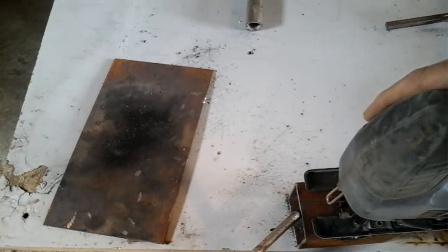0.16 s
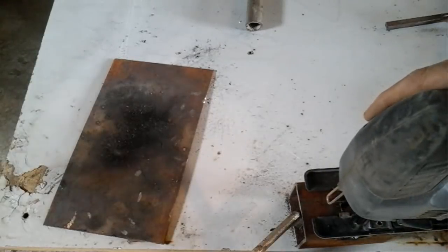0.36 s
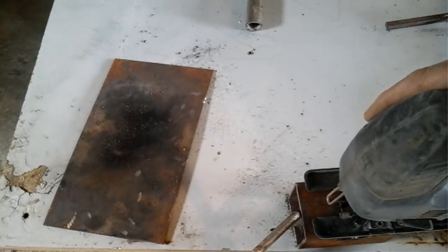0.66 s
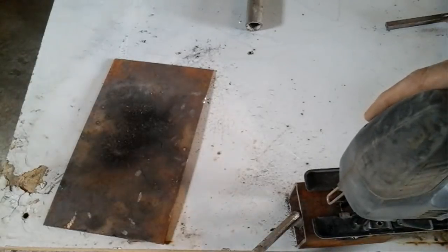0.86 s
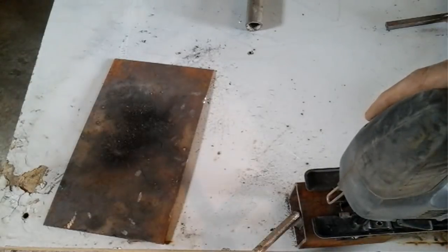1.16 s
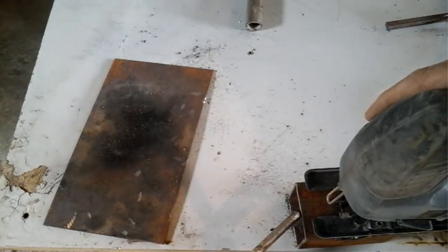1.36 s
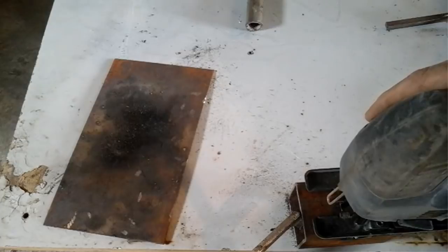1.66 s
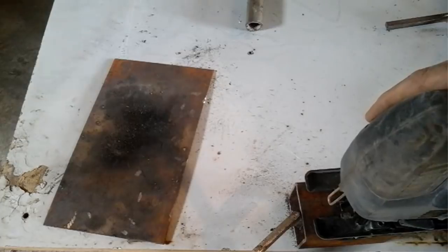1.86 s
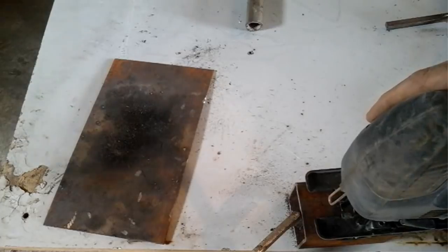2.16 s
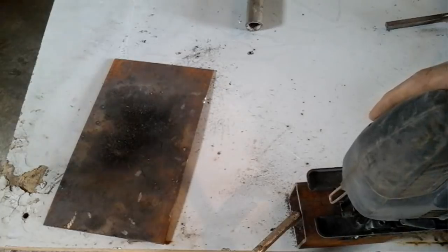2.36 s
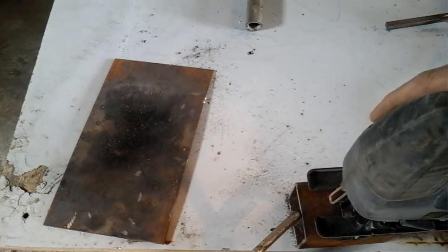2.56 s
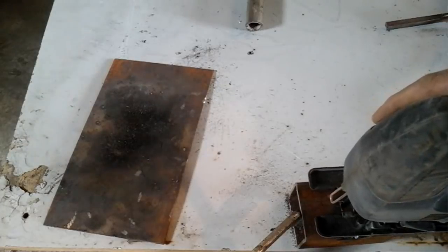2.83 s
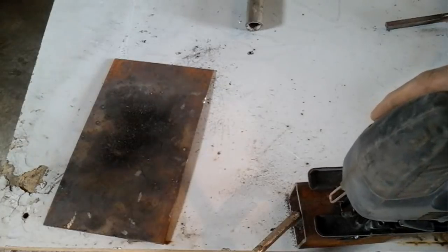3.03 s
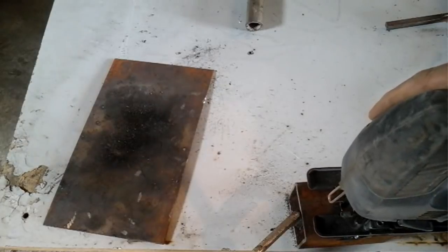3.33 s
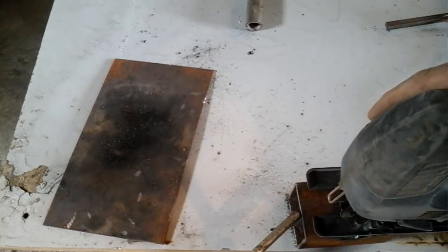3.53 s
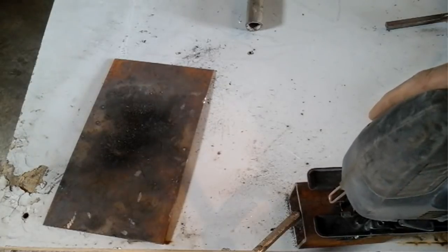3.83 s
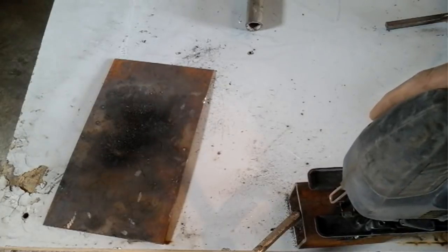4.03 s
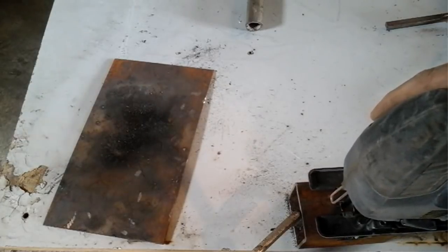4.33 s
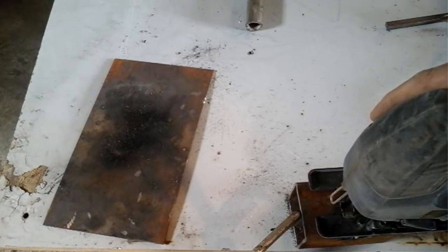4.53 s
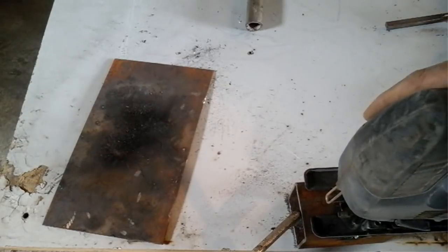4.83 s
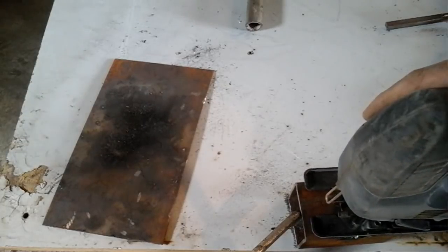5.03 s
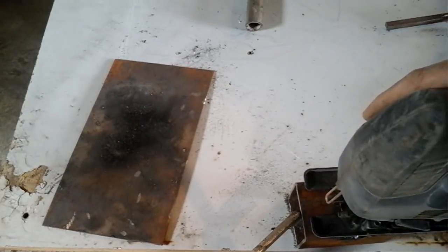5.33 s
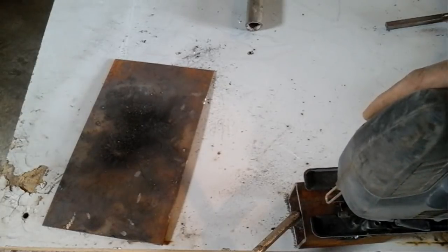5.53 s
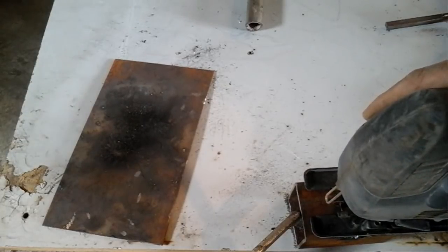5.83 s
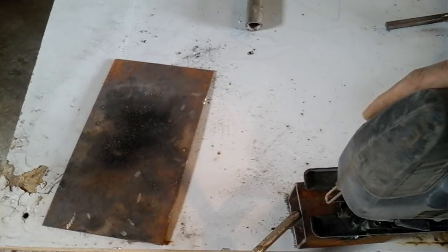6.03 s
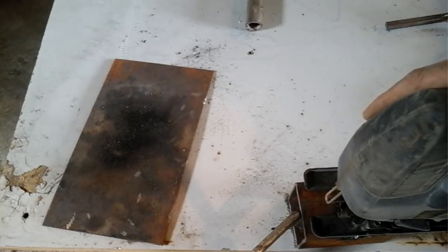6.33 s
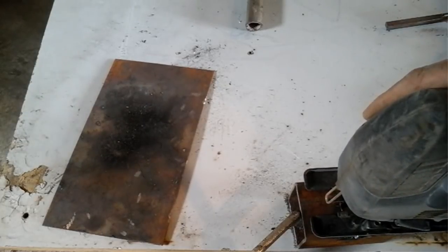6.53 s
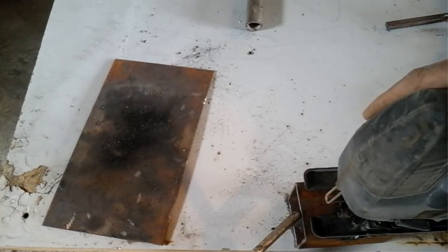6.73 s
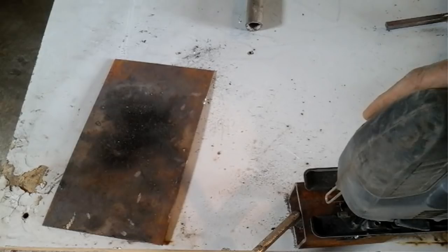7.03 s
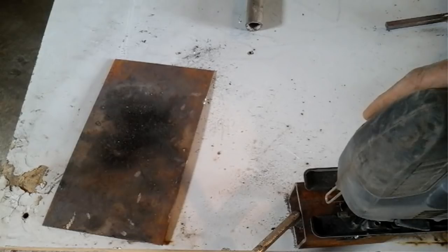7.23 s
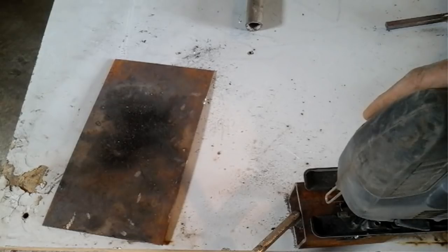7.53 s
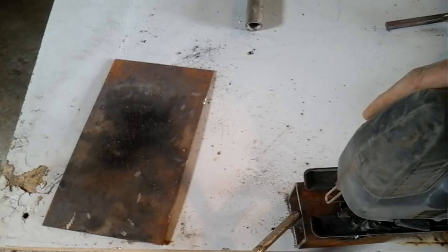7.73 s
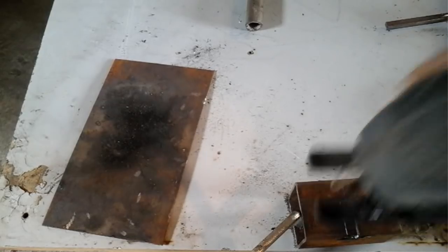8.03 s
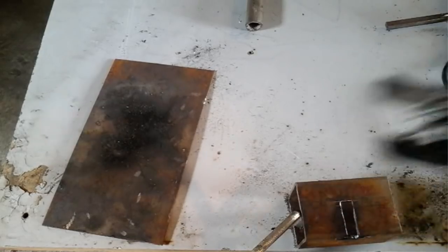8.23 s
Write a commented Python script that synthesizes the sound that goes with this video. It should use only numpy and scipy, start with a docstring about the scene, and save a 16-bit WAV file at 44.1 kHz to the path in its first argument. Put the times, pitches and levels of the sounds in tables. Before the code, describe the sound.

In a small workshop, an electric jigsaw close to the microphone kicks on, whines quickly up to speed and bites into steel. A loud, harsh, rattling buzz with a rough ringing blade holds steady, then gradually slows. Scrapes, squeaks and tooth pings give way to spaced knocks on the bench. It stops; a faint hum remains, and the blade clinks softly as it is lifted out.

```python
"""An electric jigsaw cuts a small steel piece on a workshop bench, close by and to the right, over a faint hum.
The motor kicks on the mains and whines up to 54 strokes a second; the blade bites and sings in the cut.
It coasts down through scrapes, squeaks and tooth pings into single knocks and stops; the blade clinks on lifting.
One crank speed drives coloured noise in impact envelopes, motor tones and narrow-band blade resonances.
"""
import sys
import numpy as np
from scipy import signal
from scipy.fft import rfft, irfft, next_fast_len
from scipy.io import wavfile
from scipy.ndimage import map_coordinates

SR = 44100
rng = np.random.default_rng(int(sys.argv[2]) if len(sys.argv) > 2 else 0)


def to_wav(s):
    """Save 16-bit WAV."""
    ch = np.atleast_2d(s).T  # columns
    pcm = np.round(np.clip(ch, -1, 1) * 32767)  # PCM
    wavfile.write(sys.argv[1], SR, pcm.astype(np.int16))


N = 369996

# Colour of blade on steel. Each row: frequency in Hz, relative density in dB per Hz.
CHATTER_COLOUR = [(700, -38), (1300, -12), (1800, -1.5), (2300, 0), (3200, -0.5), (4400, -5.5), (5500, -7),
                  (7000, -13.5), (9500, -25), (15000, -30)]
FULL_STROKES_PER_S = 54.35
REST_TURNS = .3622  # the crank comes to rest this far past its last knock


def amp(db):
    """Amplitude factor of a level in dB."""
    return 10 ** (np.asarray(db) / 20)


def unit(x):
    """Scale to rms 1."""
    return x / np.sqrt(np.mean(x ** 2) + 1e-20)


def along(points, hz):
    """Interpolate (Hz, value) points on a log frequency axis."""
    f, v = np.transpose(points)
    return np.interp(np.log(hz + 1), np.log(f + 1), v)


def curves(rows):
    """One value per sample for each column after the time."""
    s, *cols = np.transpose(rows)
    return [np.interp(np.arange(N) / SR, s, c) for c in cols]


def wobble(rate_hz):
    """Smooth random curve, rate_hz knots a second."""
    knots = rng.standard_normal(int(N * rate_hz / SR) + 4)
    fine = map_coordinates(knots, [np.arange(8 * len(knots)) / 8])
    return np.interp(np.arange(N) * (8 * rate_hz / SR), np.arange(len(fine)), fine)


def filtered(x, response):
    """Multiply the spectrum of x by a function of frequency."""
    m = next_fast_len(N + 8192)
    return irfft(rfft(x, m) * response(np.fft.rfftfreq(m, 1 / SR)), m)[..., :N]


def noise(spectrum):
    """Two unrelated noises of the given colour, rms 1 over both."""
    return unit(filtered(rng.standard_normal((2, N)), lambda hz: amp(along(spectrum, hz))))


def narrow(hz, width_hz):
    """Rough tone of rms 1: a carrier with random complex amplitude."""
    carrier = np.exp(2j * np.pi * np.cumsum(hz * np.ones(N)) / SR)
    return unit(((wobble(width_hz) + 1j * wobble(width_hz)) * carrier).real)


def placed(spectrum):
    """Stereo noise at the saw's place: scattered mid and side plus direct treble; its middle has rms 1."""
    # Each row: frequency in Hz, side minus mid in dB.
    side_width = [(30, -2.5), (110, 5), (200, 15), (380, 11), (700, 1.5), (1290, -2.5), (2380, -1),
                  (4400, 1), (15000, 0)]
    # Each row: frequency in Hz, left minus right in dB.
    side_lean = [(60, -7.5), (110, -5.5), (200, 3), (380, -1), (700, -3.5), (1290, 4), (2380, -6),
                 (4400, -13.5), (8120, -2.5), (15000, -3)]
    direct_db, left_lag_s = -2.5, .00043

    size = next_fast_len(N + 1)
    hz = np.fft.rfftfreq(2 * (size // 2), 1 / SR)
    white = rng.standard_normal((3, len(hz))) + 1j * rng.standard_normal((3, len(hz)))
    mid = white[0]
    side = white[1] * amp(along(side_width, hz))
    direct = white[2] * amp(direct_db) * np.clip(hz / 1000, 0, 1)
    left = mid + side + direct * np.exp(-2j * np.pi * hz * left_lag_s)
    right = mid - side + direct
    lean = amp(along(side_lean, hz) / 2)
    pair = irfft(np.array([left * lean, right / lean]) * amp(along(spectrum, hz)))[:, :N]
    return pair / np.std(pair.mean(0))


def bursts(times_s, sizes, t60_s, attack_s):
    """Envelope of impacts that rise quickly and die away; their powers add."""
    t = np.arange(SR // 4) / SR
    shape = amp(-60 * t / t60_s) * (1 - np.exp(-t / attack_s))
    at = np.clip(times_s * SR, 0, N).astype(int)
    power = np.bincount(at, sizes ** 2, N + 1)[:N]
    return np.sqrt(np.abs(signal.fftconvolve(power, (shape / shape.max()) ** 2)[:N]))


def blows(rows, spectrum, t60_s, attack_s, gain_db):
    """Single blows at listed times and levels: short bursts of coloured noise."""
    s, db = np.transpose(rows)
    return placed(spectrum) * bursts(s, amp(db + gain_db), t60_s, attack_s)


def crank_speed():
    """Strokes per second: the motor runs up, holds, then coasts against friction and air drag."""
    run_up_s, run_up_bend = .16, .8
    stop_s, friction_strokes_per_s2 = 7.68, 16.577
    drag_strokes_per_s = 62.124  # air drag equals friction at this speed

    t = np.arange(N) / SR
    driven = FULL_STROKES_PER_S * (1 - np.exp(-(t / run_up_s) ** run_up_bend))
    angle = np.clip(friction_strokes_per_s2 * (stop_s - t) / drag_strokes_per_s, 0, 1)
    coasting = drag_strokes_per_s * np.tan(angle)
    return np.minimum(driven, coasting)


def loudness(speed, full_db, octave_db, stall, bite_db):
    """Gain of a layer: follows speed in dB per octave, halves at stall (strokes/s), lower until the teeth bite."""
    bite_s = .17
    speed = np.maximum(speed, .1)
    skating = np.clip(1 - np.arange(N) / SR / bite_s, 0, 1)
    stalling = 1 + (stall / speed) ** 3
    return amp(full_db + octave_db * np.log2(speed / FULL_STROKES_PER_S) - bite_db * skating) / stalling


def before_rest(crank, turns):
    """Samples at which the crank still has so many turns to go."""
    return np.searchsorted(crank, crank[-1] - turns)


def impacts(crank, scatter_turns, size_db):
    """Impacts as the plunger reverses and the teeth bite: one round per stroke, scattered in place and force."""
    # Each row: crank position in turns, mean level in dB.
    stroke_impacts = [(0, -12), (0.222, -11), (0.447, -11.5), (0.529, -12), (0.759, -12), (.86, -13)]
    place, db = np.transpose(stroke_impacts)
    stroke = np.arange(int(crank[-1]))[:, None]
    chance = rng.standard_normal((len(stroke), len(place), 2))
    turns = stroke + place + scatter_turns * chance[..., 0]
    times_s = np.interp(turns.ravel(), crank, np.arange(N) / SR)
    return times_s, amp(db + size_db * chance[..., 1]).ravel()


def sawing(speed, crank):
    """Blade chatter, housing rattle and chip fizz: noises beaten by the impacts of each stroke."""
    # Each row: frequency in Hz, relative density in dB per Hz.
    rattle_colour = [(20, -12), (60, -15.5), (130, -8.5), (260, -8), (450, -4), (570, 2), (700, 1.5),
                     (1050, 4.5), (1300, 3.5), (1490, 8), (1750, -1.5), (2200, 0.5), (3500, -10),
                     (8000, -30.5)]
    # Each row: frequency in Hz, relative density in dB per Hz.
    fizz_colour = [(4000, -4.5), (7000, -3), (8500, 1.5), (10000, -2), (12500, -5), (14200, -6.5),
                   (15800, -17)]

    times_s, sizes = impacts(crank, scatter_turns=.026, size_db=1.8)
    # a slow crank hammers less: mostly the rubbing of teeth and gears is left
    hammer = np.clip((speed - 8) / 22, .1, 1) ** 2

    def beat(rub, t60_s, attack_s):
        envelope = unit(bursts(times_s, sizes, t60_s, attack_s))
        return np.sqrt((hammer * envelope ** 2 + rub ** 2) / (1 + rub ** 2))

    chatter = placed(CHATTER_COLOUR) * beat(rub=.6, t60_s=.022, attack_s=.00004)
    rattle = placed(rattle_colour) * beat(rub=.41, t60_s=.049, attack_s=.00034)
    fizz = placed(fizz_colour) * beat(rub=.85, t60_s=.035, attack_s=.00002)
    fizz = fizz * amp(.65 * wobble(11))  # the chips come unevenly
    out = chatter * loudness(speed, full_db=-24, octave_db=.56, stall=7.5, bite_db=4.5)
    out = out + rattle * loudness(speed, full_db=-31, octave_db=-2.13, stall=6, bite_db=6.5)
    return out + fizz * loudness(speed, full_db=-36, octave_db=3, stall=6.5, bite_db=18.5)


def backlash(speed, knock_s, free_turns, depth_db):
    """Gain dip just before each knock, as the slow crank crosses its play."""
    t = np.arange(N) / SR
    following = np.clip(np.searchsorted(knock_s, t), 0, len(knock_s) - 1)
    until_s = knock_s[following] - t
    slow = np.clip(1 - speed / 38, 0, 1)
    return amp(-depth_db * slow * np.exp(-(until_s * speed / free_turns) ** 2) * (until_s > 0))


def grit(speed, crank, count, size_db, t60_s):
    """Chips break off at random places in the stroke: a dense, sharp crackle."""
    # Each row: frequency in Hz, relative density in dB per Hz.
    grit_colour = [(1200, -18), (2000, 3), (3000, 2.5), (4600, -0.5), (6500, -11.5), (9000, -15.5),
                   (15000, -18)]
    times_s = np.interp(rng.uniform(0, crank[-1], count), crank, np.arange(N) / SR)
    sizes = amp(size_db * rng.uniform(-1, 1, count))
    crackle = unit(bursts(times_s, sizes, t60_s, attack_s=1 / SR))
    gain = loudness(speed, full_db=-31.5, octave_db=8, stall=9, bite_db=15)
    return placed(grit_colour) * crackle * gain


def rasp(speed, wander_hz, swell_db):
    """Rasping blade resonances wander and come and go as the blade leans on the cut."""
    # Each row: frequency in Hz, width in Hz, relative left level in dB, relative right level in dB.
    rasp_bands = [(3500, 450, -12, -1), (4560, 380, -6, -2.5), (6000, 500, -16, -11),
                  (11200, 500, -23, -22), (13600, 250, -28, -27)]
    out = np.zeros((2, N))
    for hz, width_hz, left_db, right_db in rasp_bands:
        pitch_hz = hz + wander_hz * wobble(3)
        swell = unit(amp(swell_db * wobble(7)))
        out += swell * np.array([amp(db) * narrow(pitch_hz, width_hz) for db in (left_db, right_db)])
    return out * loudness(speed, full_db=-29, octave_db=6.5, stall=7, bite_db=12)


def mesh_whirr(speed, width_hz, follow):
    """Narrow, rough gear-mesh whirr: its pitch follows speed and rises over the first seconds."""
    start_hz, deep_hz, sink_s = 2080, 2443, 2.6
    sinking_hz = np.interp(np.arange(N) / SR, [0, sink_s], [start_hz, deep_hz])
    hz = sinking_hz * (speed / FULL_STROKES_PER_S) ** follow + 75 * wobble(7)
    pair = np.array([amp(-1) * narrow(hz, width_hz), narrow(hz, width_hz)])
    return pair * loudness(speed, full_db=-27.8, octave_db=9, stall=9, bite_db=14.5)


def kicks():
    """The motor jerks its gears once a mains cycle as it starts."""
    # Each row: start in seconds, relative level in dB.
    kick_times = [(0.0, -7), (0.016, -3.5), (0.0325, -4.5), (0.049, -4.5), (0.0645, -4.5), (0.08, -15)]
    # Each row: frequency in Hz, relative density in dB per Hz.
    kick_colour = [(59, -59), (100, -45), (236, -27), (462, -2.5), (1000, -6.5), (1320, -12.5), (1600, 0),
                   (2300, -2.5), (3150, 1), (3600, -3.5), (4050, -14.5), (4540, -11), (6500, -18),
                   (15000, -33.5)]
    return blows(kick_times, kick_colour, t60_s=.014, attack_s=.00087, gain_db=-12)


def whine(speed, crank, flutter_db):
    """Whirr, gear mesh and high whine, strongest as the motor strains up to speed; gear play smears phase."""
    # Each row: multiple of the stroke rate, relative free-running level in dB,
    # relative level at full strain in dB, phase smear in rad.
    motor_tones = [(23, -7.5, -26, 1), (42, -4.5, 1.5, 1.2), (97, -14, 13.5, .85)]
    # Housing resonances. Each row: frequency in Hz, half width in Hz, added amplitude in dB.
    housing_modes = [(575, 44, 12), (774, 65, 9.5), (1556, 75, 12)]
    strain_at, strain_span = .66, .215  # shares of full speed

    reached = np.maximum.accumulate(speed) / FULL_STROKES_PER_S
    strain = np.exp(-np.abs((reached - strain_at) / strain_span) ** 3)
    out = np.zeros((2, N))
    for k, free_db, strain_db, stray_rad in motor_tones:
        housing = 1 + sum(amp(db) / (1 + ((k * speed - hz) / half_hz) ** 2)
                          for hz, half_hz, db in housing_modes)
        for channel, side_db in enumerate((1.5, 4)):
            phase = 2 * np.pi * k * crank + stray_rad * wobble(3 * k)
            tone = amp(side_db + flutter_db * wobble(40)) * np.sin(phase)
            out[channel] += (amp(free_db) + amp(strain_db) * strain) * housing * tone
    return out * loudness(speed, full_db=-41, octave_db=5, stall=9, bite_db=5)


def shaking(speed, crank, waver_db, stray_rad):
    """The plunger shakes the bench at multiples of the stroke rate, the two sides out of phase."""
    # Each row: multiple of the stroke rate, relative level in dB.
    shake_orders = [(2, -8), (4, 2.5), (6, -10), (8, -5), (9, -4.5), (11, 0.5), (14, 5.5), (15, 4.5)]
    tone = np.zeros(N, complex)
    for k, db in shake_orders:
        phase = 2 * np.pi * round(k) * crank + stray_rad * wobble(12)
        tone += amp(db + waver_db * wobble(7)) * np.exp(1j * phase)
    pair = np.array([amp(8.7) * tone.real, amp(5) * (tone * np.exp(2.7j)).real])
    return pair * loudness(speed, full_db=-50.5, octave_db=9, stall=9, bite_db=14)


def scrapes():
    """The slowing blade binds and chatters against the steel."""
    # Each row: start in seconds, relative level in dB.
    scrape_times = [(6.2334, -23.5), (6.2923, -30), (6.3766, -23), (6.4215, -16), (6.4449, -22),
                    (6.4923, -23.5), (6.5956, -19.5), (6.6505, -20), (6.7093, -26), (6.9139, -20),
                    (6.9967, -25.5), (7.2047, -30), (7.355, -26.5)]
    return blows(scrape_times, CHATTER_COLOUR, t60_s=.067, attack_s=.0008, gain_db=-7.5)


def teeth(speed, crank, count, gap_turns, size_db, cutting_db):
    """Single teeth catch and ping at uneven steps, strongest on the cutting stroke after a knock."""
    # Each row: frequency in Hz, relative density in dB per Hz.
    tooth_colour = [(5000, -40), (7000, -8.5), (7800, -5.5), (8700, -14.5), (11300, -14), (12600, -8.5),
                    (13600, -12), (15800, -21)]
    last_tooth_turns = .7  # before the last knock
    chance = rng.standard_normal((count, 2))
    turns = last_tooth_turns + gap_turns * np.abs(np.arange(count) + .3 * chance[:, 0])
    at = before_rest(crank, REST_TURNS + turns)
    force_db = size_db * chance[:, 1] - cutting_db * np.sin(2 * np.pi * turns)
    gain = loudness(speed, full_db=-43.5, octave_db=1, stall=4, bite_db=0)
    sizes = gain[at] * amp(force_db) * np.linspace(1, .3, count)
    return placed(tooth_colour) * bursts(at / SR, sizes, t60_s=.031, attack_s=.0003)


def knocks(speed, crank, count):
    """Times and sizes of the slowing plunger's knocks, one at each end of its travel."""
    merge_strokes_per_s, merge_span = 34.6, 16  # knocks emerge from the rattle over this span below this speed
    return_db = -16  # the far end of the travel is softer
    half = np.arange(count)[::-1]
    at = before_rest(crank, REST_TURNS + half / 2)
    apart = np.clip((merge_strokes_per_s - speed[at]) / merge_span, 0, 1)
    gain = loudness(speed, full_db=-23.5, octave_db=-4, stall=7, bite_db=0)
    return at / SR, gain[at] * apart * amp(return_db * (half % 2))


def knocking(knock_s, knock_sizes):
    """Each knock is a short burst of noise, and the housing rings on after it."""
    # Each row: frequency in Hz, relative density in dB per Hz.
    knock_colour = [(35, -45), (60, -11), (195, -13.5), (514, 0.5), (798, -0.5), (1450, 1), (2650, -2.5),
                    (2980, -6), (3580, 0), (4020, -10), (7500, -18), (12500, -27.5), (15000, -33.5)]
    # Each row: frequency in Hz, relative density in dB per Hz.
    ring_colour = [(120, -26), (190, -9), (280, -19), (480, -17), (570, 2), (680, -17), (1100, -25),
                   (1330, -16), (1470, 2.5), (1620, -13), (1900, -26), (4800, -18), (5350, -10),
                   (5900, -29), (9000, -53.5)]
    hit = placed(knock_colour) * bursts(knock_s, knock_sizes, t60_s=.07, attack_s=.0014)
    ring = placed(ring_colour) * bursts(knock_s, knock_sizes, t60_s=.31, attack_s=.0041)
    return amp(-8.5) * hit + amp(-22.5) * ring


def thuds(times_s, sizes, attack_s):
    """Knocks go through the clamp into the bench, whose damped modes give a short, hollow thud."""
    # Each row: mean frequency in Hz, relative mean level in dB, t60 in seconds.
    bench_modes = [(430, -14, .07), (560, -8.5, .09), (650, -10.5, .06), (820, -13, .05), (1450, -12, .06),
                   (1680, -14, .04)]
    spread_rad = 1.92  # phase between left and right
    out, t = np.zeros((2, N + SR)), np.arange(SR // 4) / SR
    for s, size in zip(times_s, sizes):
        for hz, db, t60_s in bench_modes:
            phase = rng.uniform(0, 2 * np.pi) + np.array([[0], [spread_rad]])
            decay = amp(db + rng.normal(0, 2) - 60 * t / t60_s)
            ring = decay * np.sin(2 * np.pi * hz * rng.normal(1, .03) * t + phase)
            out[:, round(s * SR):][:, :len(t)] += size * ring * (1 - np.exp(-t / attack_s))
    return out[:, :N]


def ticks():
    """Single teeth snap over the edge of the cut."""
    # Each row: start in seconds, relative level in dB.
    tick_times = [(7.3362, -26.5), (7.3906, -30), (7.416, -35.5), (7.4729, -29)]
    # Each row: frequency in Hz, relative density in dB per Hz.
    tick_colour = [(3000, -36), (5500, -3.5), (8000, -4.5), (11000, 1.5), (13000, -6), (15800, -9)]
    return blows(tick_times, tick_colour, t60_s=.017, attack_s=.0002, gain_db=-5)


def squeaks(sag, waver):
    """The blade squeaks in its last strokes and on its way out: tones that swell and die as their pitch sags."""
    # Each row: start in seconds, length in seconds, mid pitch in Hz, peak level in dB.
    squeak_rows = [(7.17, .12, 5380, -49), (7.35, 0.11, 5400, -53), (7.31, 0.052, 2401, -36),
                   (7.305, .035, 8600, -48), (7.348, .025, 3200, -36), (7.5, .12, 7870, -65),
                   (8.123, .065, 5230, -65), (8.13, .06, 4490, -68)]
    out = np.zeros(N)
    for s, length_s, hz, db in squeak_rows:
        u = np.linspace(0, 1, int(length_s * SR))
        pitch_hz = hz * (1 + sag * (.5 - u) + waver * wobble(302)[:len(u)])
        tone = np.sin(2 * np.pi * np.cumsum(pitch_hz) / SR)
        out[round(s * SR):][:len(u)] += amp(db) * np.sin(np.pi * u) * tone
    return out


def steel(x, ripple_db=2):
    """Resonances of saw and clamped steel ring on after impacts; countless small modes ripple the colour."""
    # Each row: frequency in Hz, width in Hz, lift in dB.
    steel_modes = [(215, 12, 3.5), (446, 59, 5), (580, 73, 2), (1367, 59, 3), (1637, 140, 3),
                   (2450, 180, 1), (3550, 410, 1.5), (4660, 130, 1.5), (5380, 200, 2.4), (7740, 410, 2.5),
                   (10700, 620, 2)]

    def response(f):
        modes = 1
        for hz, width_hz, db in steel_modes:
            modes = modes + (amp(db) - 1) * 1j * f * width_hz / (hz * hz - f * f + 1j * f * width_hz)
        ripple = map_coordinates(rng.standard_normal(300), [f / 90]) * np.clip(f / 12000, 0, 1)
        return modes * amp(ripple_db * ripple)

    return filtered(x, response)


def lifting():
    """The blade touches the steel as it stops and on its way out and rings; the shoe slides off."""
    # Each row: start in seconds, relative level in dB, brightness in dB per octave.
    clink_rows = [(7.475, -59, 24), (8.132, -55.5, -4)]
    # Each row: frequency in Hz, relative mean level in dB, t60 in seconds.
    blade_modes = [(2330, -14, 0.17), (4490, -8, .2), (5230, 0, 0.16), (6600, -15, .15), (7260, -11, .17),
                   (7800, -16, 0.3)]
    # Each row: time in seconds, sliding level in dB.
    slide_level = [(7.95, -96.5), (8.08, -73), (8.17, -57.5), (8.25, -64.5), (8.39, -63.5)]
    # Each row: frequency in Hz, relative density in dB per Hz.
    slide_colour = [(200, -12.5), (600, -4), (1500, -3), (4000, -6.5), (7000, -23.5), (14000, -36)]

    out, t = np.zeros(N + SR), np.arange(SR // 2) / SR
    for s, db, bright_db in clink_rows:
        ring = np.zeros(len(t))
        for hz, level_db, t60_s in blade_modes:
            mode_db = level_db + bright_db * np.log2(hz / 5200) + rng.normal(0, 2)
            ring += amp(mode_db - 60 * t / t60_s) * np.sin(2 * np.pi * hz * t)
        out[round(s * SR):][:len(t)] += amp(db - 3) * ring * (1 - np.exp(-t / .012))
    return out[:N] + amp(curves(slide_level)[0]) * noise(slide_colour)


def workshop(x):
    """Room reverberation: a noise tail in which each frequency dies at its own speed."""
    # Each row: frequency in Hz, t60 in seconds.
    room_decay = [(200, 0.27), (1500, 0.48), (5000, 0.51), (14000, 0.23)]
    hz, t, z = signal.stft(rng.standard_normal((2, SR // 2)), SR, nperseg=256)
    decay = amp(-60 * t / along(room_decay, hz)[:, None])
    tail = signal.istft(z * decay, SR, nperseg=256)[1]
    delayed = np.pad(tail, ((0, 0), (300, 0)))  # samples
    return signal.fftconvolve(x, delayed / np.linalg.norm(tail[0]), axes=1)[:, :N]


def background():
    """Room air as coloured noise, and a faint hum as a tone of wavering pitch and level."""
    # Each row: time in seconds, hum level in dB.
    hum_level = [(7.62, -56), (7.79, -69), (7.84, -56), (7.92, -53), (7.945, -62), (7.965, -53),
                 (8.03, -62), (8.1, -56), (8.18, -54), (8.39, -55)]
    # Each row: frequency in Hz, relative density in dB per Hz.
    air_colour = [(15, -45), (25, -23), (43, -18), (120, -14.5), (300, -8), (400, -12), (540, -5),
                  (770, -14.5), (1000, -17), (2500, -28.5), (13500, -35.5), (15000, -38)]
    hum_hz = 601
    phase = 2 * np.pi * np.cumsum(hum_hz + 6 * wobble(45)) / SR
    flutter = unit(amp(2.5 * wobble(28)))
    hum = amp(curves(hum_level)[0]) * flutter * np.array([np.sin(phase), np.sin(phase + 1.2)])
    return hum + amp(-55.5) * noise(air_colour)


def scene():
    """One crank speed drives the whole saw, close by in the workshop."""
    speed = crank_speed()
    crank = np.cumsum(speed) / SR  # strokes made so far
    knock_s, knock_sizes = knocks(speed, crank, count=40)

    struck = sawing(speed, crank) * backlash(speed, knock_s, free_turns=.15, depth_db=9.5)
    struck = struck + grit(speed, crank, count=2600, size_db=8, t60_s=.009)
    struck = struck + kicks() + scrapes() + ticks()
    struck = struck + teeth(speed, crank, count=200, gap_turns=.14, size_db=4, cutting_db=4)
    struck = struck + knocking(knock_s, knock_sizes)

    singing = rasp(speed, wander_hz=120, swell_db=2) + mesh_whirr(speed, width_hz=440, follow=.75)
    singing = singing + squeaks(sag=.017, waver=.011)
    tones = whine(speed, crank, flutter_db=2) + shaking(speed, crank, waver_db=2, stray_rad=.35)

    near = steel(struck) + thuds(knock_s, knock_sizes, attack_s=.0013) + tones + singing + lifting()
    return near + amp(-9.5) * workshop(near) + background()


def record(dry):
    """Round off the highest peaks, then remove everything above the band limit."""
    top_hz = 15800
    rounded = dry / (1 + np.abs(dry / .8) ** 6) ** (1 / 6)
    return filtered(rounded, lambda hz: hz < top_hz)


dry = scene()
out = record(dry)
to_wav(out)
```